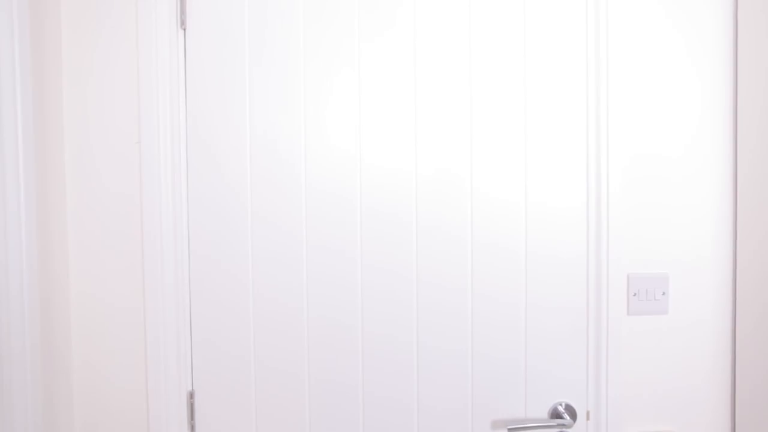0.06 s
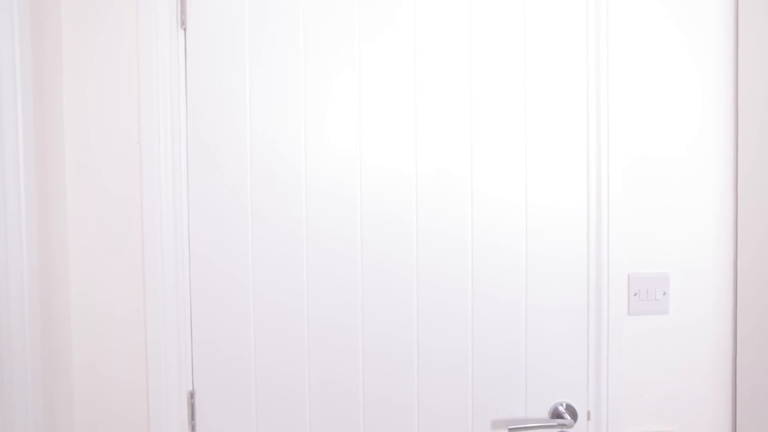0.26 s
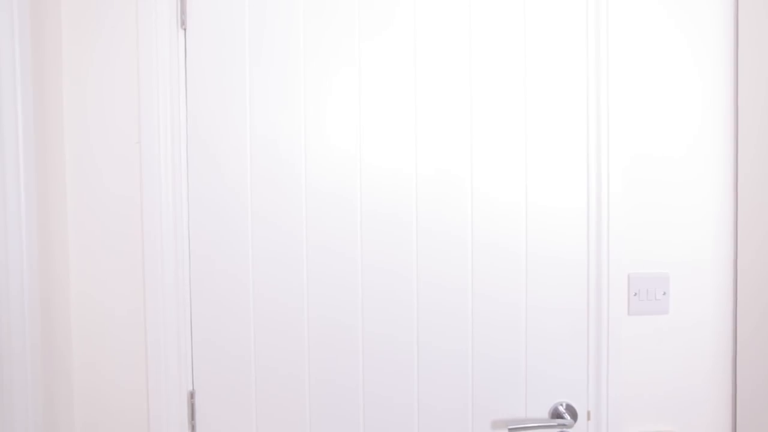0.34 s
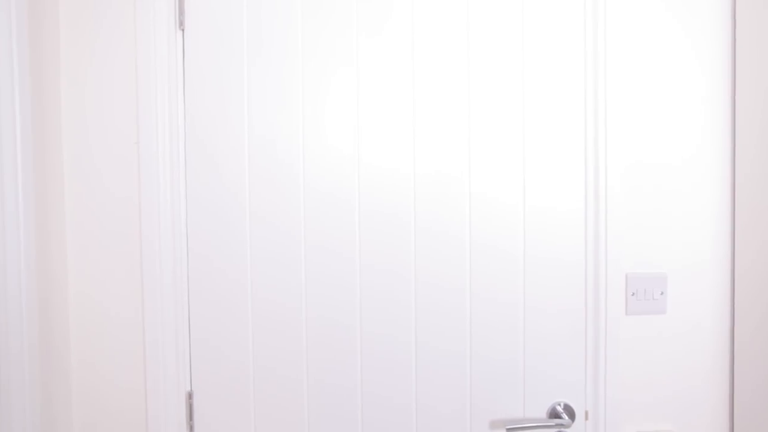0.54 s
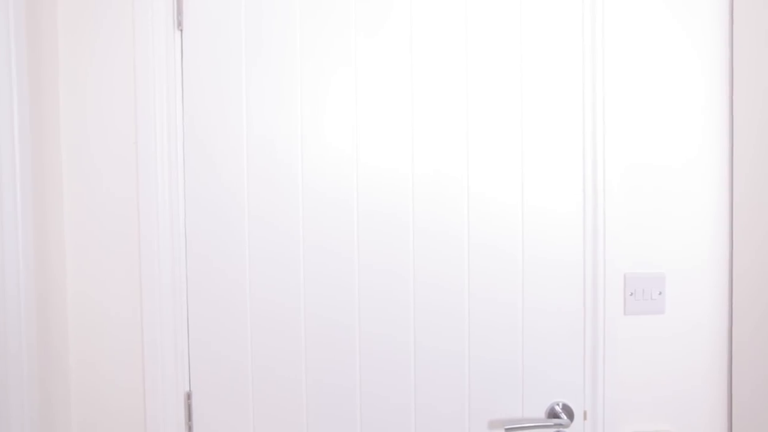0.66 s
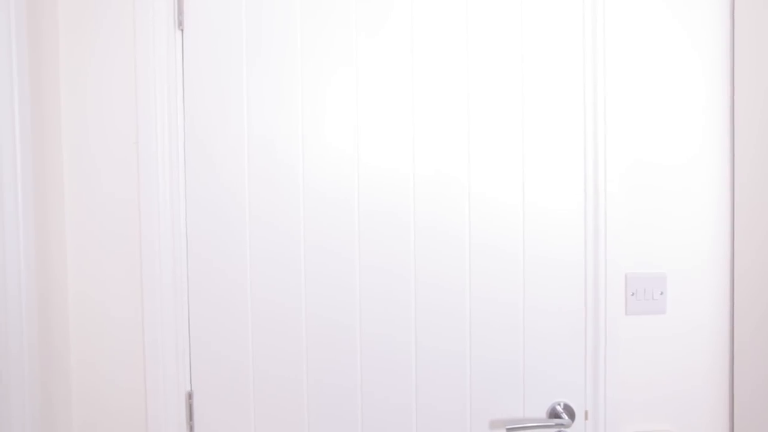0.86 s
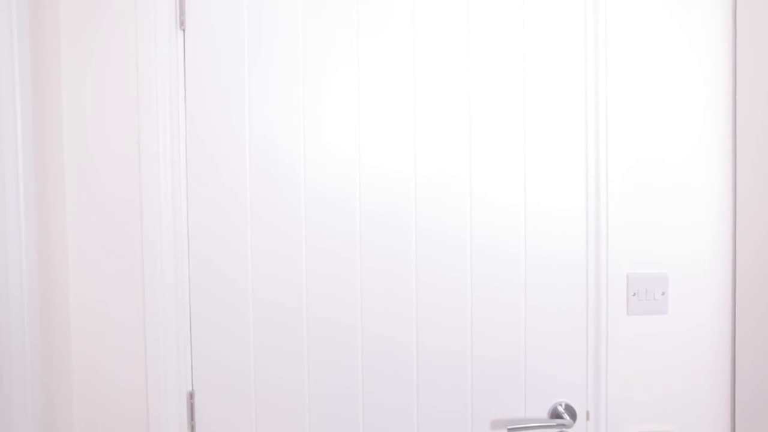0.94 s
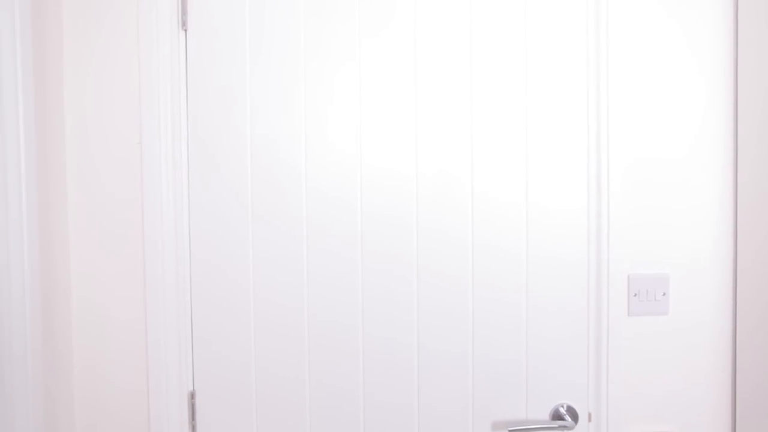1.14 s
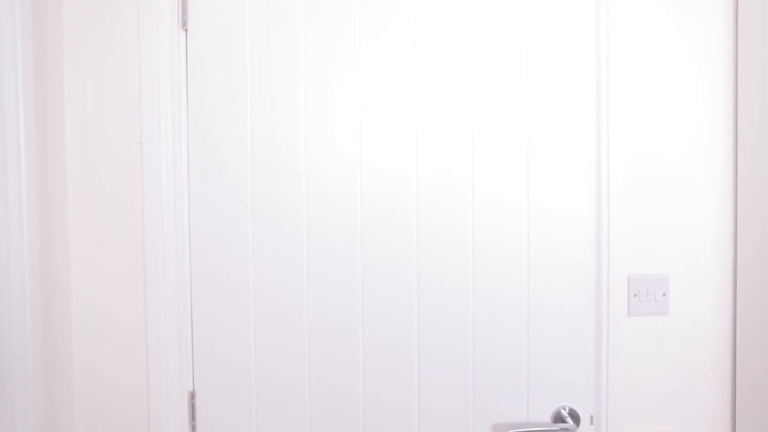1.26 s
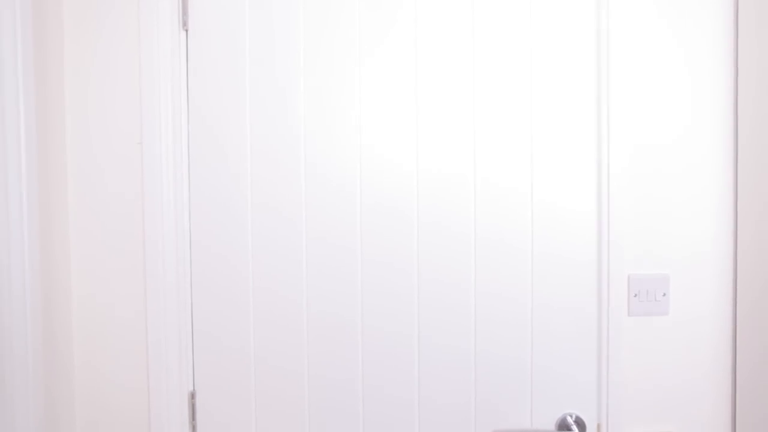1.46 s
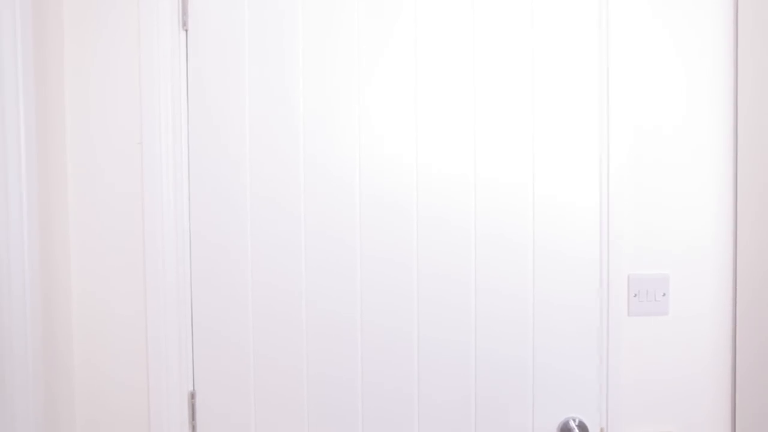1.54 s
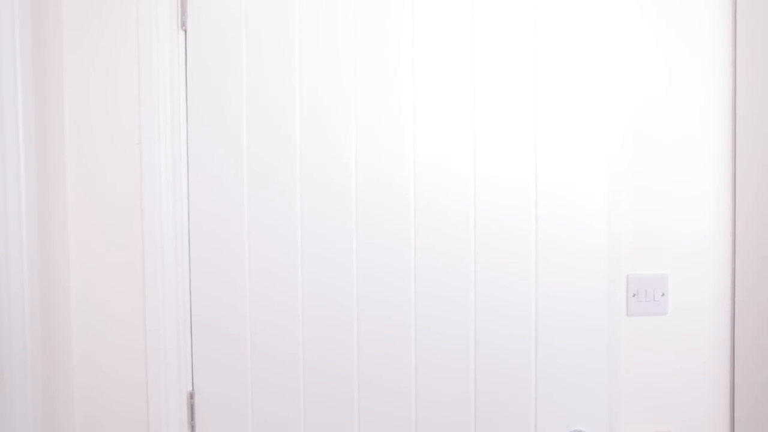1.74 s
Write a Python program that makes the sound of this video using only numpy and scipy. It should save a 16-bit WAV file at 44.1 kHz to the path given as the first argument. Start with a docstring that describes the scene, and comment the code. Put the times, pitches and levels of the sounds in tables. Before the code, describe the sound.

Knocking on a wooden door, three fast raps heard up close in a quiet hallway. After a short pause the latch snaps with a sharp double click, and the door wobbles and opens with a barely audible hinge squeak.

```python
"""A small hallway, stereo microphone close to a wooden interior door, over quiet room tone.
Three quick knuckle knocks ring the panel and rock the door in its frame; the last one shakes the latch.
The lever handle turns with a faint scrape, then the bolt snaps against two stops in a sharp double click.
The freed door shudders and swings open with a thin hinge squeak and a low rumble of moving air."""
import sys
import numpy as np
from scipy import signal
from scipy.io import wavfile
from scipy.ndimage import uniform_filter1d

SR = 44100
rng = np.random.default_rng(int(sys.argv[2]) if len(sys.argv) > 2 else 0)


def digitize_waveform(pressure):
    """Quantize a signal to 16-bit integers and store it at the path in sys.argv[1].

    Rows of a 2-D input are taken as channels; values are limited to [-1, 1].
    """
    field = np.atleast_2d(pressure).T
    bounded = np.clip(field, -1, 1)
    quanta = np.round(bounded * 32767).astype(np.int16)
    wavfile.write(sys.argv[1], SR, quanta)


N = 79380
SCENE_T = np.arange(N) / SR
HIT_T = np.arange(SR) / SR  # one second for a hit to die away

# Knuckle knocks: start_s, level_db, bass_db, spot (0 or 1)
KNOCKS = [(0.2228, -2.5, 3, 0), (0.3805, -2, 0.5, 0), (0.5446, -2, 4, 1)]
# The whole door rocking in its frame: pitch_hz, t60_s, level_db, left_right_db, swing_sign
ROCKING_MODES = [(49.4, 1.09, -24.5, -7, -1), (74.9, 0.78, -25.5, 4, 1), (84.6, 0.63, -29, 1, 1),
                 (98.6, 0.28, -34.5, -20.5, 1), (142.9, .3, -32.5, -7, 1)]
# Door panel resonances: pitch_hz, t60_s, spot0_db, spot1_db, left_right_db, swing_sign
PANEL_MODES = [(184.2, 0.38, -32.5, -27.5, -9, 1), (221.2, 0.23, -41.5, -26.5, 6, 1),
               (311.2, 0.28, -24.5, -31, 6, 1), (346.5, 0.42, -31, -38, 0.5, 1),
               (410.1, 0.36, -26.5, -32.5, 6.5, 1), (442.5, .31, -48.5, -34, 10.5, 1),
               (512, 0.13, -18.5, -19, -4, -1), (549.4, 0.11, -19.5, -17, 9, 1),
               (621.4, 0.16, -18, -14.5, -6.5, 1), (637.7, 0.35, -30, -26, 13, 1),
               (647.7, 0.034, -24, -8, -0.5, 1), (771, 0.37, -41.5, -39, 0.5, 1),
               (898, 0.28, -37, -30.5, -2.5, 1), (1019, .11, -26.5, -36.5, -4.5, -1)]
# Dense, quickly dying wood modes, as a spectrum: frequency_hz, spot0_db, spot1_db
WOOD_SPECTRUM = [(140, 1, 3), (307, -5, -8), (450, -6, -17.5), (620, 0.5, 3), (790, -7, 7), (920, -1, 1),
                 (1054, -5, -6), (1180, -13.5, -14.5), (1290, -16.5, -5), (1550, -16.5, -16),
                 (1630, -29.5, -31.5), (1973, -20, -13.5), (2440, -37.5, -30), (3243, -43.5, -31.5),
                 (5000, -53, -54.5), (15000, -56.5, -51.5)]
# The bolt hitting its stops: start_s, level_db, crack_db, stop (0 or 1), bounce_gap_s, bounce_growth_db
LATCH_CLICKS = [(1.102, 1, -3, 0, 0.0023, -2), (1.1234, 1.5, -2.5, 1, .002, 1)]
# Resonances of the latch and the wood around it: pitch_hz, t60_s, stop0_db, stop1_db
LATCH_MODES = [(536, 0.087, -32.5, -32.5), (584, 0.045, -47, -50), (770, 0.11, -44, -32),
               (964, 0.029, -33, -22), (1014, .04, -33.5, -24), (1425, 0.044, -29.5, -31),
               (1537, 0.033, -26, -29.5), (1860, 0.026, -24.5, -37.5), (2293, 0.024, -28, -34),
               (3140, 0.046, -40, -42), (3508, 0.015, -28.5, -39)]
# Crack of one bolt bounce: frequency_hz, gain_db
CRACK_SPECTRUM = [(60, -18), (130, 4), (250, -5.5), (400, 2), (560, 5), (800, 2), (1400, 1), (2100, -1.5),
                  (2800, -8), (4000, -9), (7000, -14.5), (12000, -15), (16000, -19)]
# Wobbles of the freed door: start_s, level_db
SHUDDERS = [(1.111, -17.5), (1.166, -6), (1.23, -10.5)]
# Lever friction through the turn: time_s, level_db
HANDLE_TURN = [(.95, -87), (.97, -60.5), (1.0, -61), (1.04, -64.5), (1.095, -63.5), (1.12, -57)]
# Colour of that friction: frequency_hz, gain_db
SCRAPE_SPECTRUM = [(200, -14), (600, 6), (1200, 2), (2100, 5.5), (4500, 2), (8000, -3.5), (11500, -1),
                   (16000, -24)]
# Hinge squeak through the swing: time_s, pitch_hz, level_db
HINGE_GLIDE = [(1.45, 3322, -78), (1.462, 3303, -75.5), (1.48, 3230, -80.5), (1.512, 3465, -66.5),
               (1.568, 3410, -83.5), (1.612, 3810, -67.5), (1.71, 3985, -64.5), (1.78, 3600, -76)]
# Tones in the squeak: pitch_ratio, level_db
SQUEAK_PARTIALS = [(0.999, -14.5), (1.322, -11.5), (2, -13)]
# Rumble of moving air: frequency_hz, gain_db
AIR_SPECTRUM = [(12, 0), (30, 0), (60, -12), (110, -23), (250, -29), (700, -40), (2000, -51), (6000, -63),
                (16000, -73)]
# Swells of that rumble: time_s, gain_db
AIR_SWELLS = [(0, -23.5), (.75, -34.5), (1.0, -12), (1.25, -14.5), (1.45, -30), (1.6, -23.5), (1.8, -10.5)]
# Hallway reverberation: frequency_hz, t60_s
HALLWAY_DECAY = [(100, 0.87), (250, 0.89), (450, 0.73), (750, 0.63), (1050, .42), (1500, .38), (4500, 0.37),
                 (12000, 0.23)]
# Hallway room tone: frequency_hz, gain_db
ROOM_TONE_SPECTRUM = [(15, 5), (30, -1.5), (60, -12), (120, -20), (250, -27.5), (600, -36.5), (1200, -37.5),
                      (3000, -47), (8000, -52), (16000, -53.5)]


def knocks(contact_s=0.0023, wood_t60_s=0.035, wood_rise_s=0.00087):
    """Each knuckle pushes the panel, rings its modes and rocks the door; the spot sets the colour."""
    boom, ring, wood = np.zeros((3, 2, N))
    grain = stereo_noise(0.91, SR) * decay(wood_t60_s) * (1 - np.exp(-HIT_T / wood_rise_s))
    contact_phase = np.pi * np.minimum(HIT_T / contact_s, 1)
    push = amp(-8.5) * pan(-3.5) * np.sin(contact_phase) ** 4
    onset = np.sin(contact_phase / 2) ** 2
    for start_s, level_db, bass_db, spot in KNOCKS:
        panel = sum(sign * pan(side_db) * mode(hz, t60_s, spot_db[spot])
                    for hz, t60_s, *spot_db, side_db, sign in PANEL_MODES)
        thud = colour(grain, np.array(WOOD_SPECTRUM)[:, [0, 1 + spot]])
        add(boom, start_s, amp(level_db) * (push + amp(bass_db) * onset * rocking()))
        add(ring, start_s, amp(level_db) * onset * panel)
        add(wood, start_s, amp(level_db + 1.5) * thud)
    return boom + ring + pan(-3.5) * wood + hallway(amp(-4) * wood + amp(-14.5) * ring)


def rocking(decay_scale=1, left_lag_s=0.00081):
    """The door leaf booms in its frame; the sound reaches the left side a little later."""
    left, right = sum(sign * pan(side_db) * mode(hz, t60_s * decay_scale, level_db)
                      for hz, t60_s, level_db, side_db, sign in ROCKING_MODES)
    return np.array([np.interp(HIT_T - left_lag_s, HIT_T, left), right])


def latch(bounces=3, crack_t60_s=0.016, rattle_s=0.597):
    """The bolt rattles after the hardest knock, and later snaps against two stops, bouncing on each."""
    rings, cracks = np.zeros((2, 2, N))
    for start_s, level_db, crack_db, stop, gap_s, growth_db in LATCH_CLICKS:
        ring = sum(mode(hz, t60_s, stop_db[stop]) for hz, t60_s, *stop_db in LATCH_MODES)
        add(rings, start_s, amp(level_db) * pan(-4.5) * ring * np.minimum(HIT_T / gap_s, 1))
        for bounce in range(bounces):
            crack = amp(-17) * colour(stereo_noise(0.5, SR) * decay(crack_t60_s), CRACK_SPECTRUM)
            add(cracks, start_s + bounce * gap_s, amp(level_db + crack_db + bounce * growth_db) * crack)
    add(cracks, rattle_s, amp(-59) * stereo_noise(0.5, SR) * decay(t60_s=0.05))
    return rings + cracks + hallway(amp(-2.5) * cracks + amp(-14) * rings)


def shudder(rise_s=0.0047):
    """Freed from the latch, the door wobbles in short, soft-edged booms."""
    wobbles = np.zeros((2, N))
    boom = rocking(decay_scale=0.32) * soft_onset(rise_s)
    for start_s, level_db in SHUDDERS:
        add(wobbles, start_s, amp(level_db) * boom)
    return wobbles


def handle(roughness_db=3):
    """Grainy friction of the lever, heard only while it turns."""
    grains = stereo_noise(0.25, N) * amp(roughness_db * rng.standard_normal(N))
    scrape = colour(grains, SCRAPE_SPECTRUM)
    return during(HANDLE_TURN) * amp(curve(HANDLE_TURN)) * scrape / scrape.std()


def hinge(pitch_jitter=0.004):
    """A thin, unsteady squeak that climbs as the door swings and sags at the end."""
    waver = uniform_filter1d(rng.standard_normal(N), size=150)
    pitch_hz = curve(HINGE_GLIDE) * (1 + pitch_jitter * waver / waver.std())
    phase = 2 * np.pi * np.cumsum(pitch_hz) / SR
    tone = sum(amp(level_db) * np.sin(ratio * phase) for ratio, level_db in SQUEAK_PARTIALS)
    squeak = during(HINGE_GLIDE) * amp(curve(HINGE_GLIDE, column=2)) * tone
    return squeak + amp(-3) * hallway(squeak[None])


def moving_air():
    """A low rumble of air, dead centre, swelling as the door moves."""
    return amp(curve(AIR_SWELLS)) * colour(stereo_noise(1, N), AIR_SPECTRUM)


def hallway(sound, rise_s=0.0013):
    """Diffuse echoes off the hallway walls, the treble dying before the bass."""
    hz, time_s, bands = signal.stft(stereo_noise(0.78, SR), SR, nperseg=256)
    bands *= np.exp(-np.log(1000) * time_s / at_frequency(HALLWAY_DECAY, hz)[:, None])
    tail = signal.istft(bands, SR, nperseg=256)[1][:, :SR] * soft_onset(rise_s)
    return signal.fftconvolve(sound, tail / np.linalg.norm(tail[0]), axes=1)[:, :N]


def room_tone():
    """The steady, bass-heavy hush of the hallway."""
    return amp(-18.5) * colour(stereo_noise(0.31, N), ROOM_TONE_SPECTRUM)


def amp(db):
    """Decibels to gain."""
    return 10 ** (np.asarray(db) / 20)


def pan(left_right_db):
    """Channel gains for a level difference; positive leans left."""
    return amp([[left_right_db / 2], [-left_right_db / 2]])


def add(mix, start_s, sound):
    """Mixes a stereo sound in at its start time."""
    part = mix[:, round(start_s * SR):][:, :sound.shape[-1]]
    part += sound[..., :part.shape[1]]


def at_frequency(table, hz):
    """Reads a table on a log-frequency axis."""
    table_hz, values = np.transpose(table)
    return np.interp(np.log(hz + 1), np.log(table_hz), values)


def curve(table, column=1):
    """Follows one column of a table through the scene."""
    rows = np.array(table)
    return np.interp(SCENE_T, rows[:, 0], rows[:, column])


def during(table):
    """A gate, open between a table's first and last times."""
    return (SCENE_T > table[0][0]) & (SCENE_T < table[-1][0])


def stereo_noise(correlation, samples):
    """Two channels of partly shared white noise."""
    left, other = rng.standard_normal((2, samples))
    return np.array([left, correlation * left + np.sqrt(1 - correlation ** 2) * other])


def colour(sound, spectrum):
    """Minimum-phase filter with the given spectrum, so nothing rings ahead of a hit."""
    hz = abs(np.fft.fftfreq(4096, 1 / SR))
    log_gain = np.log(amp(at_frequency(spectrum, hz)))
    taps = np.fft.ifft(np.exp(np.conj(signal.hilbert(log_gain)))).real
    return signal.oaconvolve(sound, taps[None], axes=1)[:, :sound.shape[1]]


def soft_onset(rise_s):
    """A rounded rise from silence to full level."""
    return 1 - np.exp(-(HIT_T / rise_s) ** 2)


def decay(t60_s):
    """Exponential fall of 60 dB in t60_s."""
    return np.exp(-np.log(1000) * HIT_T / t60_s)


def mode(hz, t60_s, level_db):
    """One struck resonance."""
    return amp(level_db) * decay(t60_s) * np.sin(2 * np.pi * hz * HIT_T)


def scene():
    """Everything that reaches the microphone by the door."""
    return knocks() + handle() + latch() + shudder() + hinge() + room_tone() + moving_air()


def record(dry):
    """The recorder cuts the treble above 16.1 kHz."""
    lowpass = signal.firwin(511, 16100, window=("kaiser", 9), fs=SR)
    return signal.oaconvolve(dry, lowpass[None], "same")


dry = scene()
out = record(dry)
digitize_waveform(out)
```